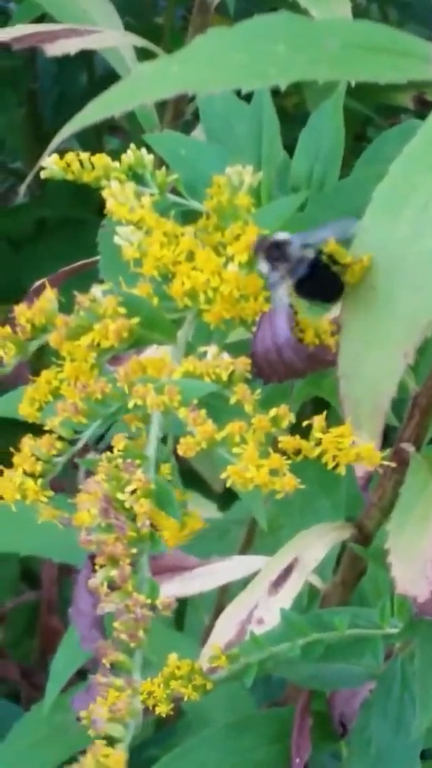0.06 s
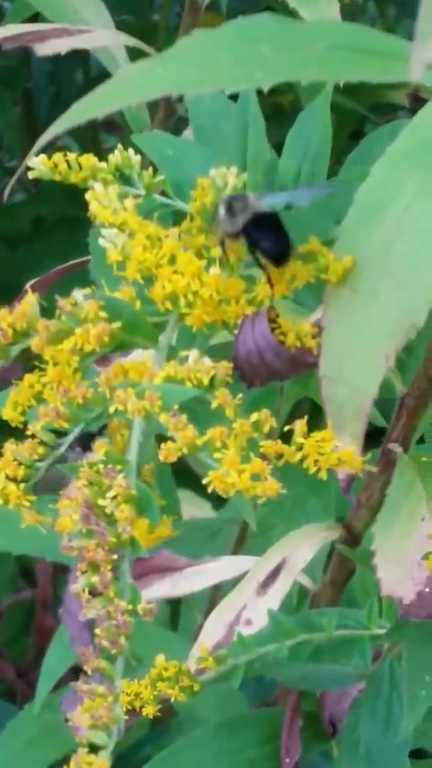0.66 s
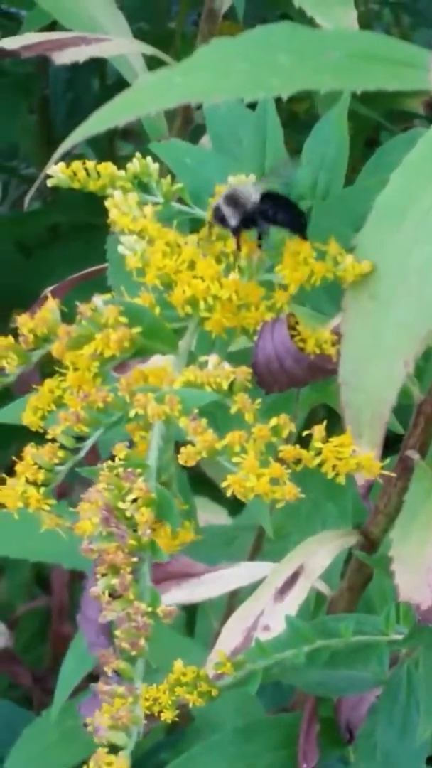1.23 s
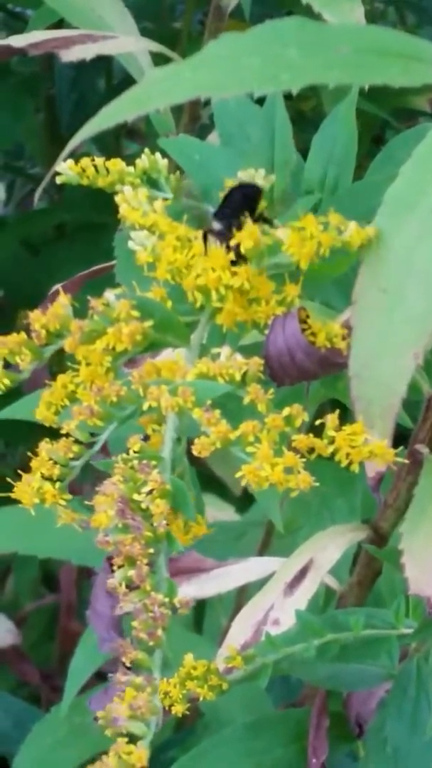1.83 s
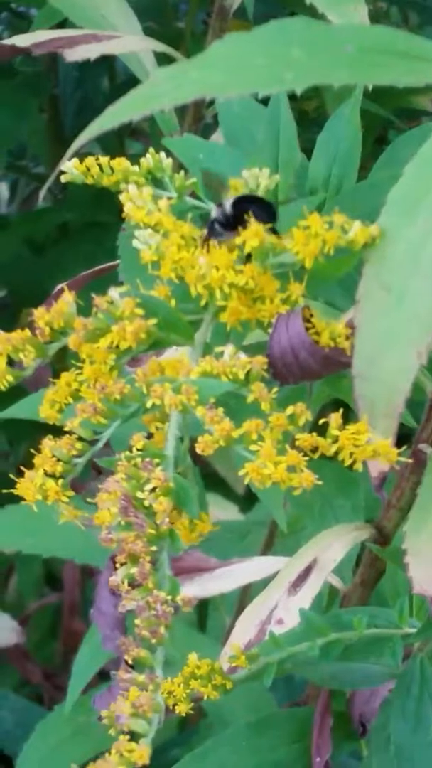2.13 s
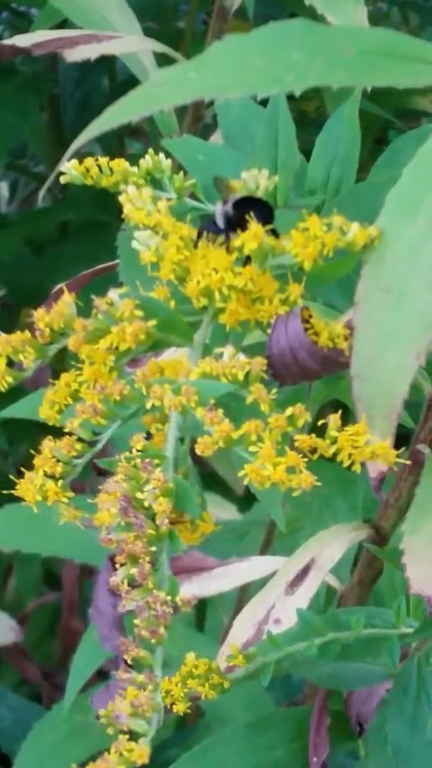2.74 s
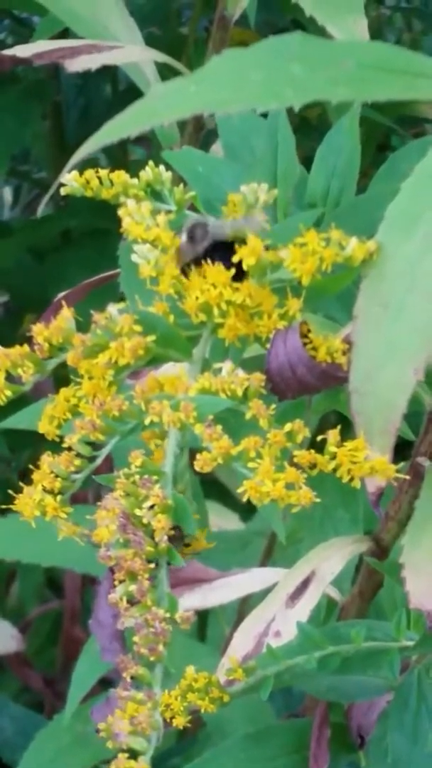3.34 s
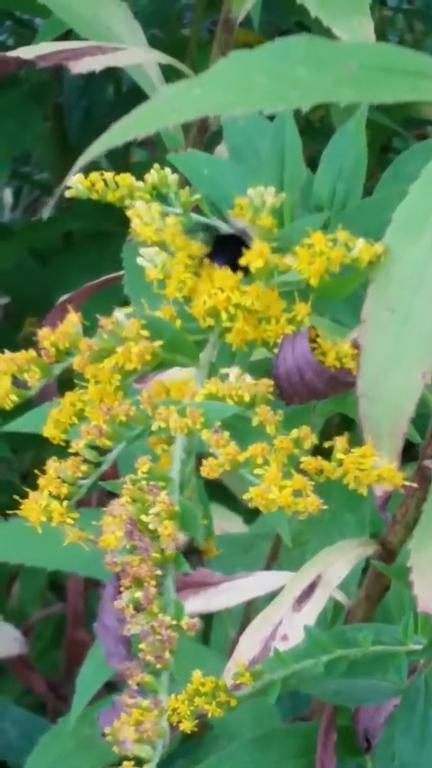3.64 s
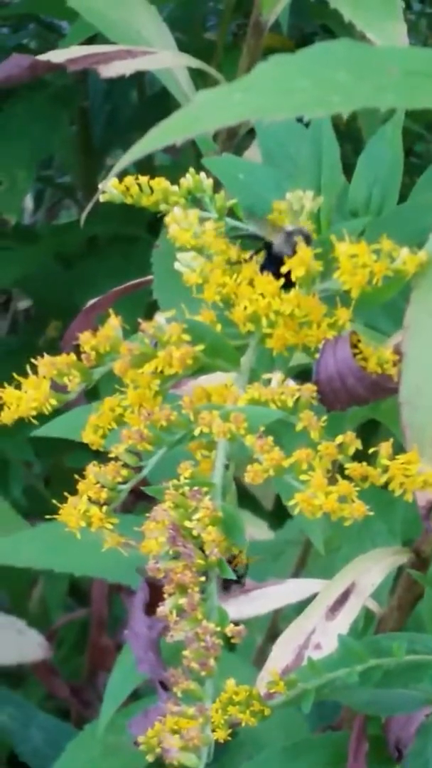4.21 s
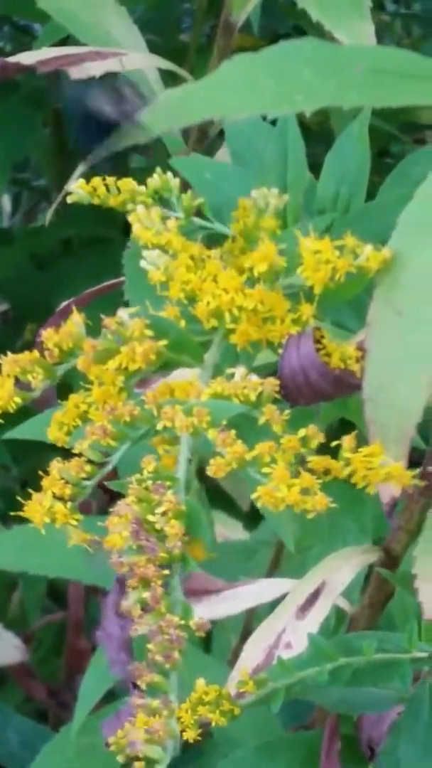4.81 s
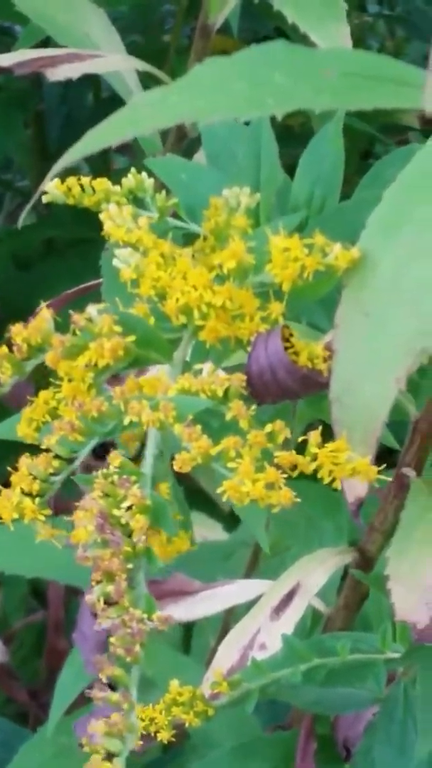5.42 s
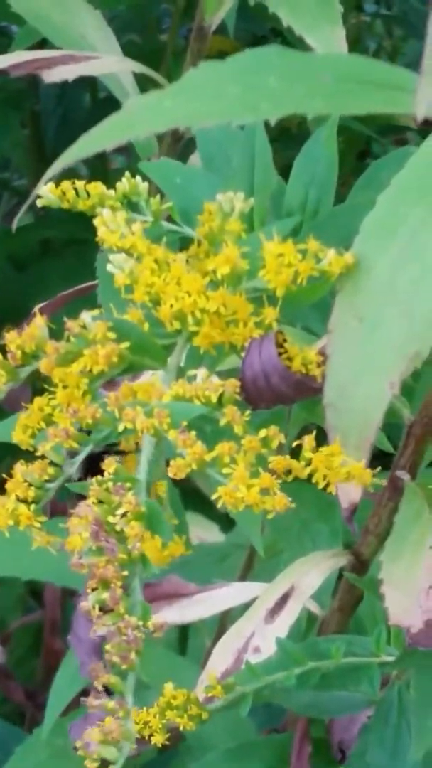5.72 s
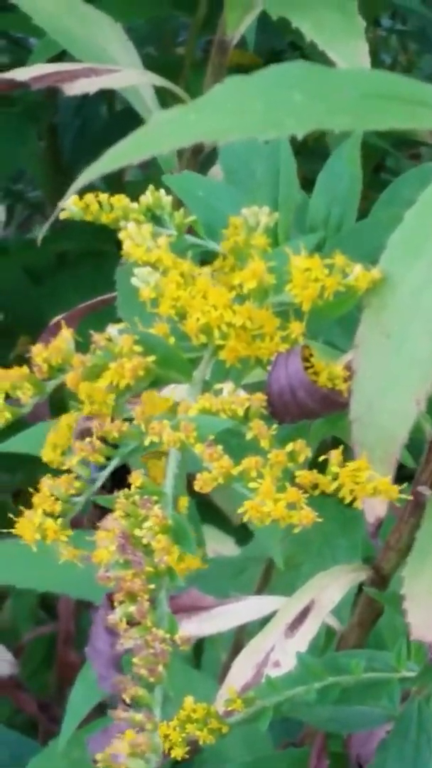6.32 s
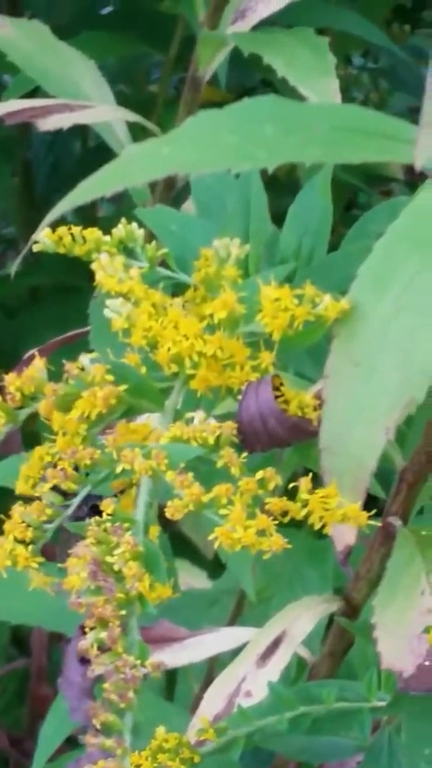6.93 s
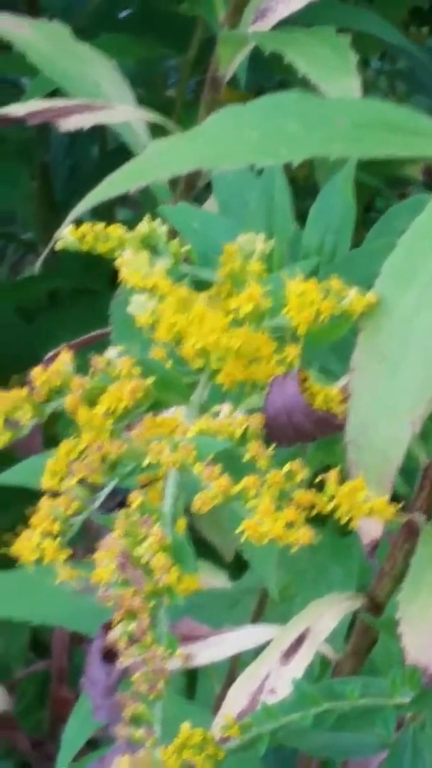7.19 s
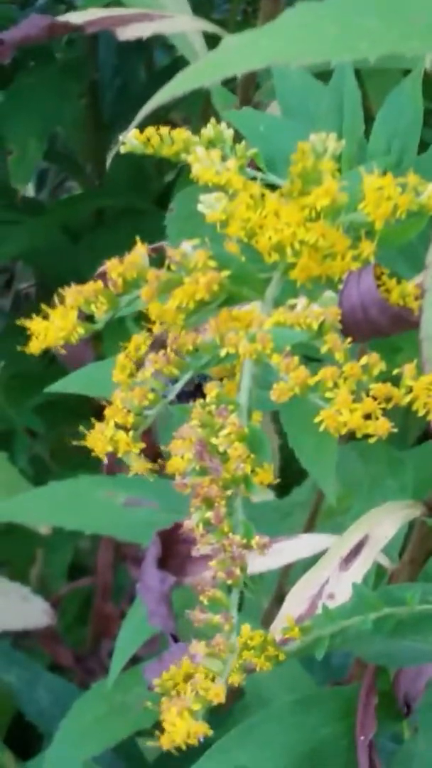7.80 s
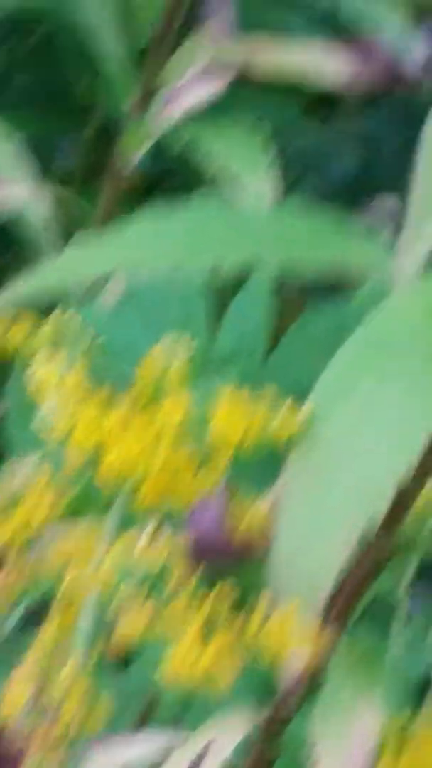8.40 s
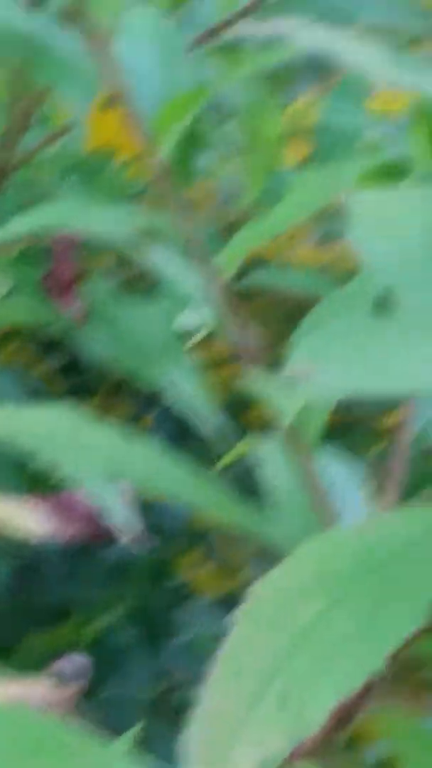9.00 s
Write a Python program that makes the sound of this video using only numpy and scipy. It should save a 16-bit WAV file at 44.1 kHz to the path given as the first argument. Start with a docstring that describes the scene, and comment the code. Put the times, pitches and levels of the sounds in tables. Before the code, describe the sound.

Low traffic rumble and a far engine hum outdoors, with trilling insects, faint crickets, a soft buzz and a short microphone knock.

```python
"""A late-summer garden, heard from a hand-held device close to a flowering plant.
Far traffic rumbles, an engine drone swells and sinks in pitch as it passes, a deeper engine throbs,
a faint buzz hangs behind them and something squeals in the distance. Insects trill on the left by
stridulation, each wing stroke dragging a file over a scraper, against far crickets and a fine hiss.
Leaves brush each other, and near the end two bumps of the hand excite the damped modes of the case."""
import sys
import numpy as np
from scipy import signal
from scipy.fft import rfft, irfft, next_fast_len
from scipy.io import wavfile

SR = 44100
rng = np.random.default_rng(int(sys.argv[2]) if len(sys.argv) > 2 else 0)


def wrap_up_sound(samples):
    """Save the sound to the file named by the first command line argument, as 16-bit audio."""
    columns = np.atleast_2d(samples).T
    # keep every value between -1 and 1, then stretch to whole-number steps
    tamed = np.clip(columns, -1, 1)
    steps = np.round(tamed * 32767).astype(np.int16)
    wavfile.write(sys.argv[1], SR, steps)


N = 403515
TIME_S = np.arange(N) / SR
BIN_HZ = np.arange(N // 2 + 1) * SR / N


def from_db(db):
    """Amplitude ratio: tenfold for every 20 dB."""
    return 10 ** (np.asarray(db) / 20)


def unit_rms(x):
    """Normalisation to unit power."""
    return x / np.sqrt(np.mean(x ** 2) + 1e-20)


def in_time(rows):
    """Linear interpolation of each column at every sample."""
    times, *columns = np.transpose(rows)
    return [np.interp(TIME_S, times, c) for c in columns]


def in_hz(rows):
    """Interpolation of each column over log frequency at every bin."""
    hz, *columns = np.transpose(rows)
    return np.array([np.interp(np.log(BIN_HZ + 1), np.log(hz), c) for c in columns])


def drift(corner_hz):
    """Low-pass Gaussian noise: a random wandering of unit power."""
    step = 8
    size = next_fast_len(N // step + 2, True)
    hz = np.arange(size // 2 + 1) * SR / step / size
    slow = irfft(rfft(rng.standard_normal(size)) / (1 + (hz / corner_hz) ** 2), size)
    return np.interp(np.arange(N) / step, np.arange(size), unit_rms(slow))


def swell(level_db):
    """Gain of a level curve relative to its median."""
    return from_db(level_db - np.median(level_db))


def held(start, end, attack_s, release_s):
    """Trapezoidal envelope: rises from the start, holds at 1, falls after the end."""
    return np.clip(np.minimum((TIME_S - start) / attack_s, 1 - (TIME_S - end) / release_s), 0, 1)


def white():
    """Spectra of two uncorrelated white noises at 0 dB per Hz."""
    return rfft(rng.standard_normal((2, N))) * np.sqrt(SR / 2)


def place(x, left_db, lag_s):
    """Level and time differences: sound from the left reaches the right port weaker and later."""
    late = irfft(rfft(x) * np.exp(-2j * np.pi * BIN_HZ * lag_s), N)
    return np.array([x * from_db(left_db / 2), late * from_db(-left_db / 2)])


def scatter(x, t60, wet_db):
    """Diffuse reflection from plants and walls adds an exponential tail, different at each port."""
    t = np.arange(int(t60 * SR) + 2) / SR
    tail = rng.standard_normal((2, len(t))) * np.exp(-np.log(1000) * t / t60)
    tail /= np.sqrt(np.sum(tail ** 2, axis=1, keepdims=True))
    return x + from_db(wet_db) * signal.fftconvolve(x, tail, axes=1)[:, :N]


def tone(hz, level_db, partials, waver, waver_hz, fading_db, fading_hz):
    """A wavering harmonic series; its partials (number, gain [dB]) fade in and out through the air."""
    phase = 2 * np.pi * np.cumsum(hz * (1 + waver * drift(waver_hz))) / SR
    waves = sum(from_db(db + fading_db * drift(fading_hz)) * np.sin(k * phase) for k, db in partials)
    return np.sqrt(2) * from_db(level_db) * waves


# Traffic noise: (frequency [Hz], left density [dB/Hz], right density [dB/Hz])
TRAFFIC_SPECTRUM = [(20, -79, -76), (40.7, -77, -77.5), (65.6, -66, -64.5), (92.5, -67.5, -65),
                    (136, -72, -69.5), (214, -78, -79.5), (377, -80.5, -82), (596, -83, -88),
                    (952, -83, -90), (1470, -90.5, -94.5), (1980, -97, -103), (2950, -108, -112),
                    (6000, -135, -138)]
# Likeness of the traffic at the two ports: (frequency [Hz], coherence [0-1])
TRAFFIC_COHERENCE = [(60, 0.95), (150, 0.96), (250, 0.66), (400, 0.72), (600, 0.48), (900, 0.96), (1400, 0),
                     (2500, 0.15)]
# Contour of the rumble, before scaling by its depth: (time [s], relative level [dB])
RUMBLE_CONTOUR = [(0.0, -50.5), (1.38, -50.5), (1.81, -53), (8.64, -51.5), (9.15, -57)]
# Background contours: (time [s], relative tyre wash before scaling [dB], relative insect chorus [dB])
BACKGROUND_CONTOURS = [(0.0, -57.5, -62.5), (3.41, -59, -62.5), (3.74, -59, -63.5), (4.38, -58, -61.5),
                       (5.22, -56, -61), (5.89, -57, -60.5), (6.34, -55.5, -61.5), (7.06, -58.5, -62.5),
                       (9.15, -59.5, -64)]

def traffic(split_hz=130, rumble_depth=0.51, wash_depth=0.89, lag_s=0.00021):
    """Spatial coherence: long waves reach both ports alike. Rumble and tyre wash swell separately."""
    left, unrelated = white()
    coherence = in_hz(TRAFFIC_COHERENCE)[0]
    right = coherence * left + np.sqrt(1 - coherence ** 2) * unrelated
    delay = np.exp(-2j * np.pi * BIN_HZ * lag_s)
    spectrum = np.array([left, right * delay]) * from_db(in_hz(TRAFFIC_SPECTRUM))
    deep = 1 / (1 + (BIN_HZ / split_hz) ** 4)
    rumble = irfft(spectrum * deep, N) * swell(rumble_depth * in_time(RUMBLE_CONTOUR)[0])
    wash = irfft(spectrum * (1 - deep), N) * swell(wash_depth * in_time(BACKGROUND_CONTOURS)[0])
    return rumble + wash


# Many far insects: (frequency [Hz], left density [dB/Hz], right density [dB/Hz])
CHORUS_SPECTRUM = [(1530,-120,-125), (2560,-99,-105), (2847,-90,-103), (3210,-86.5,-101), (3650,-89.5,-108),
                   (4800,-93.5,-112), (5200,-88.5,-111), (5970,-99.5,-114), (6020,-115,-127),
                   (6890,-109,-123), (7380,-126,-129), (8750,-124,-127), (10900,-135,-138)]

def insect_chorus(flicker_db=0.58, flicker_hz=60):
    """Incoherent addition: countless far insects merge into a flickering band of noise."""
    noise = irfft(white() * from_db(in_hz(CHORUS_SPECTRUM)), N)
    return noise * swell(in_time(BACKGROUND_CONTOURS)[1]) * from_db(flicker_db * drift(flicker_hz))


# Fine high hiss: (frequency [Hz], left density [dB/Hz], right density [dB/Hz])
HISS_SPECTRUM = [(6700, -138, -138), (10000, -126, -128), (10620, -115, -117), (11900, -114, -115),
                 (12650, -115.5, -115.5), (14100, -112, -112), (15800, -106, -108)]
# Contour of the hiss: (time [s], relative level [dB])
HISS_CONTOUR = [(0.0, -81.5), (0.89, -77.5), (1.63, -79), (2.83, -78.5), (3.13, -78.5), (4.0, -80.5),
                (4.43, -76.5), (4.71, -74.5), (5.43, -75), (6.06, -74), (6.22, -75.5), (6.62, -76),
                (6.86, -79.5), (7.72, -76), (8.26, -81), (9.15, -78.5)]

def high_hiss(flicker_db=.9, flicker_hz=35):
    """Incoherent addition: countless small sources merge into a flickering treble hiss."""
    noise = irfft(white() * from_db(in_hz(HISS_SPECTRUM)), N)
    return noise * swell(in_time(HISS_CONTOUR)[0]) * from_db(flicker_db * drift(flicker_hz))


# Contour of the passing engine, before scaling by its contrast: (time [s], relative level [dB])
DRONE_CONTOUR = [(0.0, -49), (0.05, -49), (1.58, -53), (1.81, -43), (2.29, -55.5), (2.7, -40), (2.8, -52.5),
                 (3.36, -46), (3.44, -60), (3.64, -43), (3.85, -59), (4.18, -40.5), (4.28, -49),
                 (4.53, -38.5), (6.06, -36), (6.22, -46.5), (7.03, -46), (7.16, -56.5), (8.66, -53.5),
                 (9.07, -61), (9.15, -58)]

def passing_engine(approach_hz=109.85, leaving_hz=84.7, passes_s=5.7, sink_s=2.1, contrast=1.024):
    """Doppler shift: the drone holds its pitch on approach and sinks once the engine has passed."""
    gone_s = np.maximum(TIME_S - passes_s, 0)
    hz = leaving_hz + (approach_hz - leaving_hz) * np.exp(-gone_s / sink_s)
    contour_db, = in_time(DRONE_CONTOUR)
    level_db = -33.6 + contrast * (contour_db - contour_db.max())
    return tone(hz, level_db, [(1, -2), (2, -34)], waver=.0069, waver_hz=6.9, fading_db=1.4, fading_hz=10)


# Surges of a deeper engine further off: (time [s], level [dB])
THROB_CONTOUR = [(0.0, -61), (0.67, -43.5), (0.83, -72.5), (1.1, -41.5), (1.77, -69.5), (2.03, -42),
                 (2.2, -66.5)]

def deep_engine(start_hz=69.4, sag_hz_per_s=1.35, end_s=1.9):
    """Amplitude modulation makes a low tone throb; its pitch follows the slowing engine."""
    hz = start_hz - sag_hz_per_s * TIME_S
    level_db, = in_time(THROB_CONTOUR)
    running = held(0, end_s, attack_s=0.043, release_s=.3)
    return running * tone(hz, level_db, [(1, -1)], waver=.012, waver_hz=7, fading_db=1.5, fading_hz=8)


def faint_buzz(start_hz=89.64, sag_hz=3.6, far_db=-62, near_db=-54.5, nearest_s=6.5, stays_s=2.85):
    """A harmonic series swells as its source nears, ebbs as it withdraws and slowly goes flat."""
    hz = start_hz - sag_hz * (np.arange(N) / N) ** 3.5
    nearness = np.exp(-((TIME_S - nearest_s) / stays_s) ** 2)
    level_db = far_db + (near_db - far_db) * nearness
    partials = [(1, -4.5), (2, -1.5), (3, -9.5), (4, -21.5), (5, -19.5), (6, -20)]
    return tone(hz, level_db, partials, waver=0.0042, waver_hz=5.9, fading_db=2.5, fading_hz=2)


def far_crickets(pitch_hz=3330, width_hz=55):
    """Random modulation spreads the crickets' steady note into a narrow band."""
    note = np.sin(2 * np.pi * pitch_hz * TIME_S)
    return from_db([[-72], [-78]]) * note * np.array([drift(width_hz), drift(width_hz)])


def trill(per_s, pitch_hz, width_hz, duty, uneven_db, sweep_hz, rasp):
    """Stridulation: each stroke drags a file over a scraper, and the wing rings with sagging pitch."""
    strokes = np.cumsum(per_s * (1 + .015 * drift(12))) / SR
    progress = np.minimum(strokes % 1 / duty, 1)
    # every stroke starts the wing afresh, with a force and phase of its own
    force, offset = rng.standard_normal((N // 100, 2))[strokes.astype(int)].T
    pressure = np.sin(np.pi * progress) ** 2 * from_db(uneven_db * force)
    phase = 2 * np.pi * (np.cumsum(pitch_hz + sweep_hz * (.5 - progress)) / SR + offset)
    wing = (1 + rasp * drift(width_hz)) * np.sin(phase) + rasp * drift(width_hz) * np.cos(phase)
    return unit_rms(pressure * wing)


def radiate_wing(x, band_hz=(4950, 5800)):
    """Resonance: a wing radiates only around its own band, here from the weeds close on the left."""
    band = signal.sosfilt(signal.butter(2, band_hz, "band", fs=SR, output="sos"), x)
    return scatter(from_db([[0], [-23]]) * band, t60=.05, wet_db=-15)


def scatter_treble(x):
    """Scattering blurs the highest insect sounds, which lie a little to the left."""
    return scatter(from_db([[0], [-5]]) * x, t60=.1, wet_db=-6)


# Fast, loud bouts of the near insect: (start [s], end [s], level above its soft trill [dB])
NEAR_BOUTS = [(-.9, 0, 6), (1.55, 2.95, 7.8), (4.55, 6.1, 8), (7.3, 8.65, 5)]

def near_insect(soft_per_s=55, fast_per_s=72.5, soft_db=-66.8, turn_s=8.54, loss_db_per_s=25):
    """Stridulation in bouts: effort lifts stroke rate and level, and the rate drops back first."""
    haste = sum(held(start, end, attack_s=.33, release_s=.4) for start, end, _ in NEAR_BOUTS)
    lift_db = sum(db * held(start, end, attack_s=.33, release_s=.9) for start, end, db in NEAR_BOUTS)
    turned_db = loss_db_per_s * np.maximum(TIME_S - turn_s, 0)   # the microphone swings away
    level_db = soft_db + lift_db - turned_db + 1.15 * drift(5)
    per_s = soft_per_s + (fast_per_s - soft_per_s) * haste
    wing = trill(per_s, pitch_hz=5415, width_hz=400, duty=.72, uneven_db=1.6, sweep_hz=280, rasp=.25)
    return radiate_wing(from_db(level_db) * wing)


# Bouts of a thin high insect buzz: (start [s], end [s], level [dB])
THIN_INSECT_BOUTS = [(.45, 2.2, -94), (3.3, 3.7, -92), (4.85, 5.6, -89.5)]

def thin_insect(per_s=110):
    """Rapid stridulation: the strokes fuse into a thin high buzz."""
    gain = sum(from_db(db) * held(start, end, attack_s=.33, release_s=.9)
               for start, end, db in THIN_INSECT_BOUTS)
    wing = trill(per_s, pitch_hz=11300, width_hz=220, duty=1, uneven_db=3, sweep_hz=305, rasp=1.1)
    return scatter_treble(gain * wing)


# Far squeals: (start [s], length [s], first pitch [Hz], last pitch [Hz], level [dB], waver [fraction])
SQUEAL_GLIDES = [(.8, .22, 1110, 1170, -57.5, .014), (.99, .32, 1170, 1225, -53.5, .007),
                 (1.22, .4, 1205, 1185, -60, .014), (4.74, .5, 1890, 1950, -69, .016),
                 (5.05, .85, 1245, 1150, -61.5, .016)]

def squeals(arch=.035, peak_share=0.49):
    """Frequency modulation: thin rough tones glide along an arch, blurred by reverberation."""
    direct = 0
    for start, length, first_hz, last_hz, db, waver in SQUEAL_GLIDES:
        along = np.clip((TIME_S - start) / length, 0, 1)
        hz = (first_hz + (last_hz - first_hz) * along) * (1 + arch * np.sin(np.pi * along))
        envelope = np.interp(along, [0, peak_share, 1], [0, 1, 0])
        direct += envelope * tone(hz, db, [(1, 0)], waver, waver_hz=50, fading_db=2, fading_hz=20)
    return scatter(place(direct, left_db=5.5, lag_s=0.00023), t60=0.95, wet_db=-6.5)


# Leaf against leaf: (time [s], level [dB], length [s], left minus right [dB])
LEAF_BRUSHES = [(1.92, -72, .05, 0), (4.588, -68, .025, 0), (4.62, -67, .028, 0), (4.742, -61.5, .015, 1),
                (4.775, -70, .03, 0), (5.066, -68, .008, 0), (7.452, -72, .008, 0), (8.84, -71, .035, -7),
                (8.962, -68.5, .007, -14), (9.079, -69.5, .006, -12)]
# Colour of a brush: (frequency [Hz], left relative level [dB], right relative level [dB])
LEAF_SPECTRUM = [(2500, -35, -35), (7500, -17, -19), (10000, -13, -14), (12000, -6, -6), (15500, 0, 0),
                 (17000, -30, -30)]

def leaves(grain_db=5.5):
    """Friction noise: each brush is a bright, grainy puff that rises quickly and dies away."""
    envelope = 0
    for start, db, length, left_db in LEAF_BRUSHES:
        age = np.maximum(TIME_S - start, 0) / (length / 2)
        envelope += from_db([[db + left_db / 2], [db - left_db / 2]]) * age * np.exp(1 - age)
    grains = from_db(grain_db * np.clip(drift(500), -2, 2))
    noise = irfft(white() * from_db(in_hz(LEAF_SPECTRUM)), N)
    return envelope * unit_rms(noise * grains)


def ring(force, hz, t60):
    """Damped oscillator: a unit impulse starts a decaying sine of height 1."""
    decay, angle = 1000 ** (-1 / (t60 * SR)), 2 * np.pi * hz / SR
    return signal.lfilter([0, np.sin(angle)], [1, -2 * decay * np.cos(angle), decay ** 2], force + 1e-18)


# Fingertip on the case: (time [s], impulse level [dB], contact time [s])
CASE_BUMPS = [(7.193, -24, .0005), (8.3453, -17.5, .00002)]
# Modes of the case: (frequency [Hz], left gain [dB], right gain [dB], 60 dB decay time [s])
CASE_MODES = [(164, -3, -3.5, 0.014), (520, 2, -10, 0.0077), (903, -1, -11, 0.016),
              (1480, -4.5, -19, 0.0069), (3570, -14, -37, 0.0053), (5350, -10.5, -40, 0.0044)]

def case_bumps(soften_s=0.0002, leak_hz=70):
    """Impact excitation: a fingertip rings the heavily damped case; a longer contact is duller."""
    force = 0
    for time, db, contact_s in CASE_BUMPS:
        touch = np.exp(-np.abs(TIME_S - time) / (contact_s / 2))
        force += from_db(db) * touch / touch.sum()
    pole = np.exp(-1 / (soften_s * SR))
    push = signal.lfilter([1 - pole], [1, -pole], force + 1e-18)
    # the slowest part of the push leaks away through the ports
    push = signal.sosfilt(signal.butter(1, leak_hz, "high", fs=SR, output="sos"), push)
    sound = 0
    for k, (hz, left_db, right_db, t60) in enumerate(CASE_MODES):
        makeup = np.hypot(1, 2 * np.pi * hz * soften_s)   # offsets the softening at this mode
        sound += (-1) ** k * from_db([[left_db], [right_db]]) * makeup * ring(push, hz, t60)
    return sound


def second_insect(start_s=7.28, end_s=7.88, per_s=68):
    """Stridulation with an overtone: a raspier insect joins for one bout."""
    gain = from_db(-60) * held(start_s, end_s, attack_s=.16, release_s=0.26)
    wing = trill(per_s, pitch_hz=5120, width_hz=600, duty=1, uneven_db=-1.2, sweep_hz=734, rasp=.85)
    overtone = trill(per_s, pitch_hz=10600, width_hz=400, duty=.98, uneven_db=3.5, sweep_hz=930, rasp=1.2)
    return radiate_wing(gain * wing) + scatter_treble(from_db(-26.5) * gain * overtone)


def scene():
    """Superposition: far sounds, insects and the small sounds near the hand add at each port."""
    background = traffic() + insect_chorus() + high_hiss()
    hums = place(passing_engine() + deep_engine() + faint_buzz(), left_db=-1.7, lag_s=0.00026)
    insects = far_crickets() + near_insect() + thin_insect() + second_insect()
    return background + hums + insects + squeals() + leaves() + case_bumps()


def record(dry):
    """Band limiting: a steep elliptic low-pass cuts the treble above 15720 Hz."""
    return signal.sosfilt(signal.ellip(12, .1, 80, 15720, fs=SR, output="sos"), dry)


dry = scene()
out = record(dry)
wrap_up_sound(out)
```